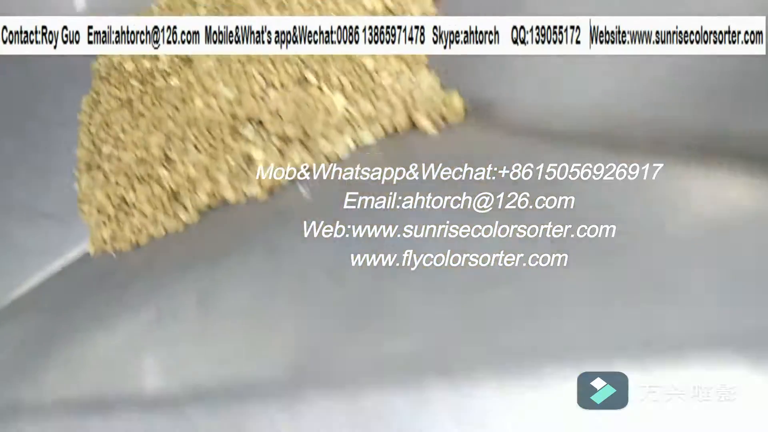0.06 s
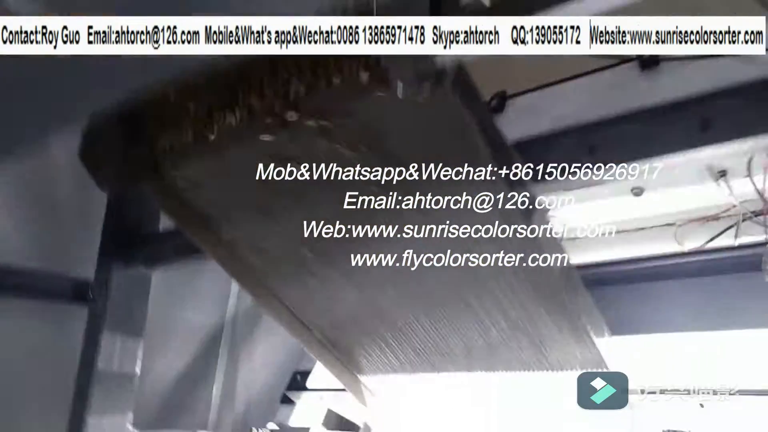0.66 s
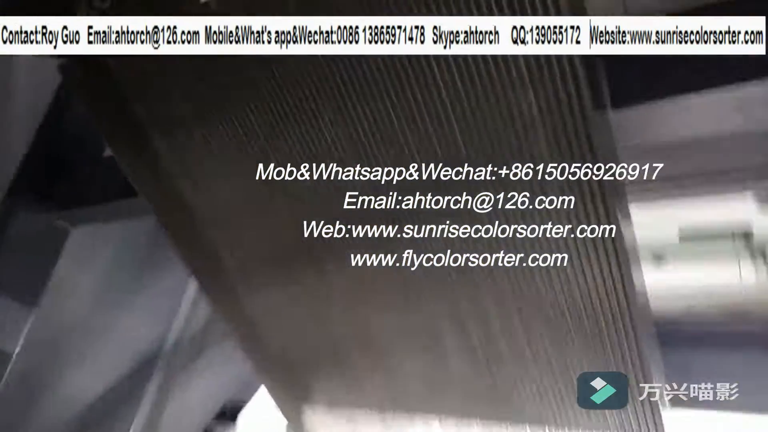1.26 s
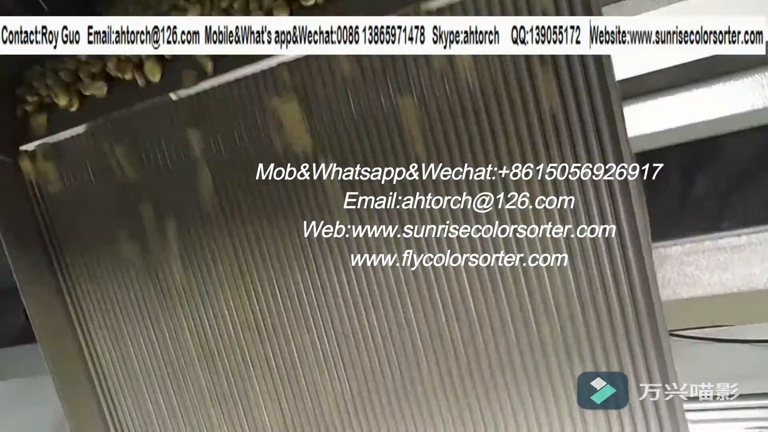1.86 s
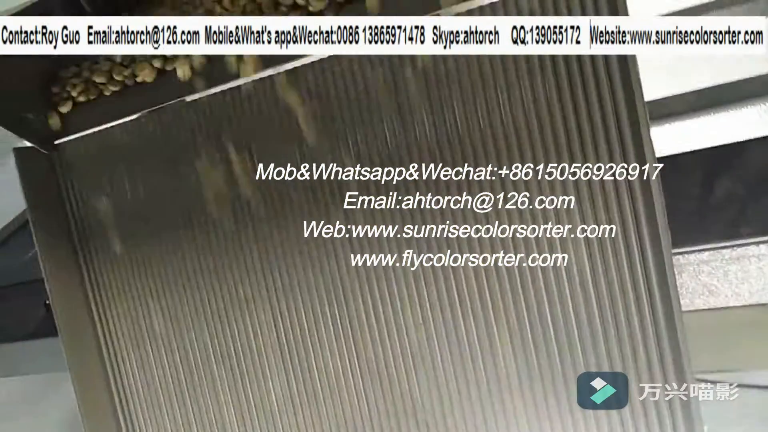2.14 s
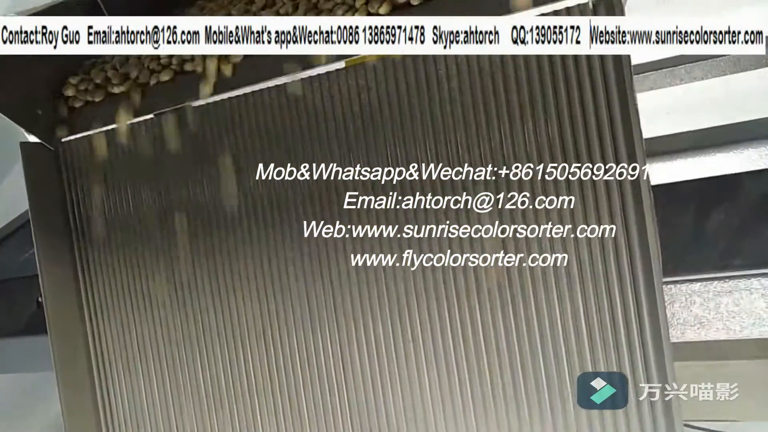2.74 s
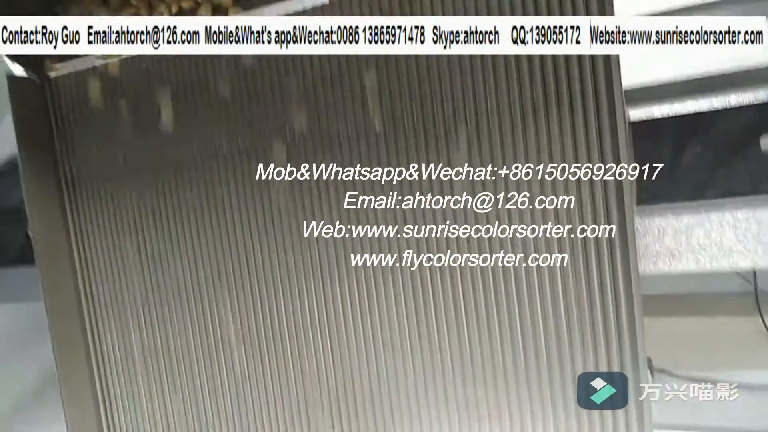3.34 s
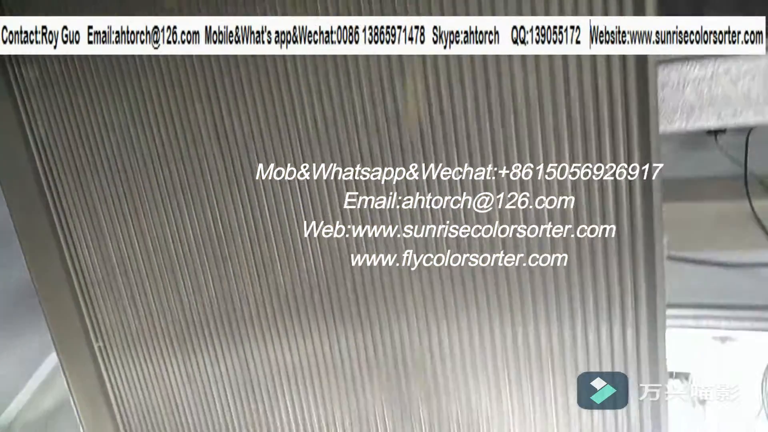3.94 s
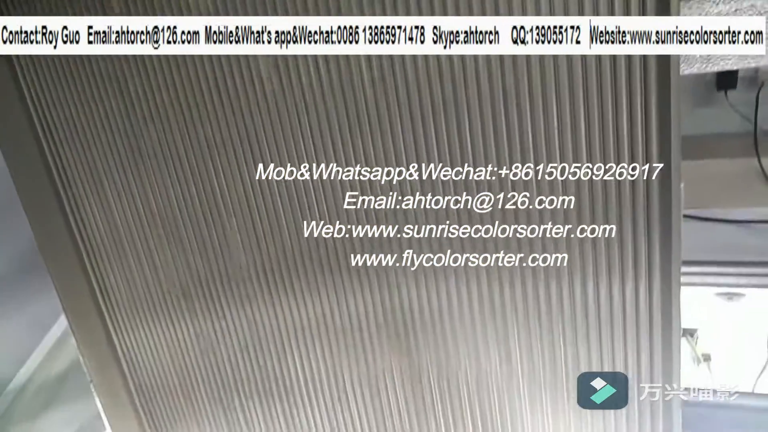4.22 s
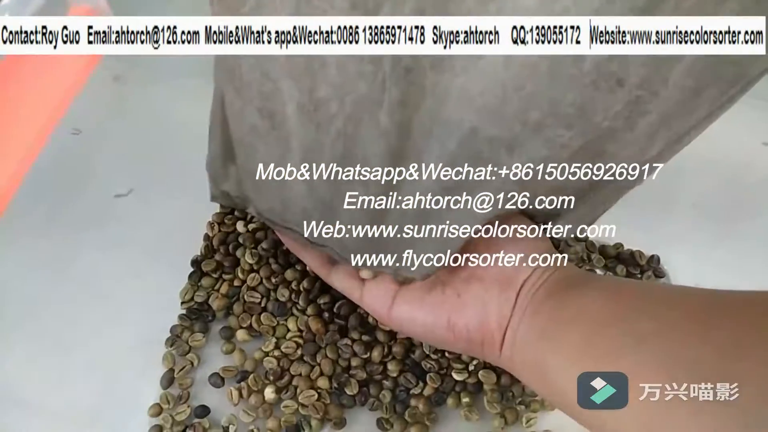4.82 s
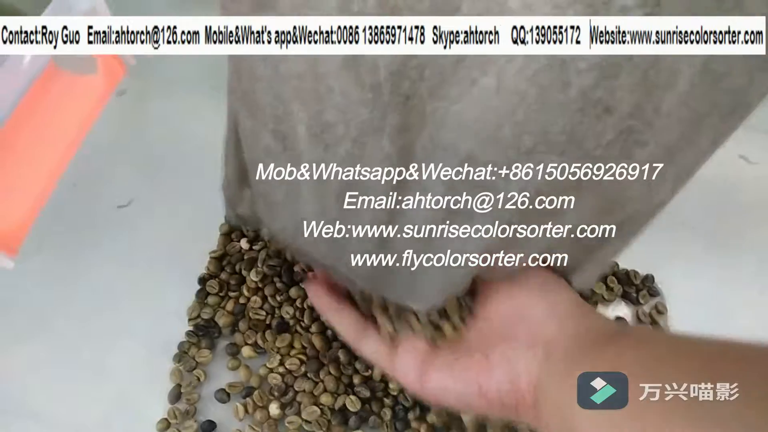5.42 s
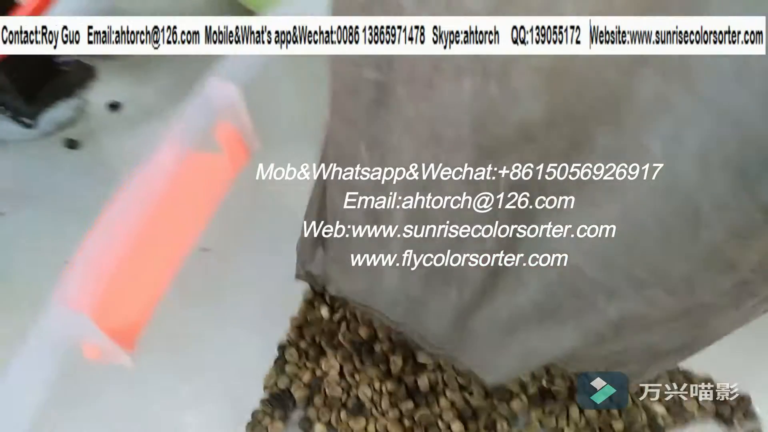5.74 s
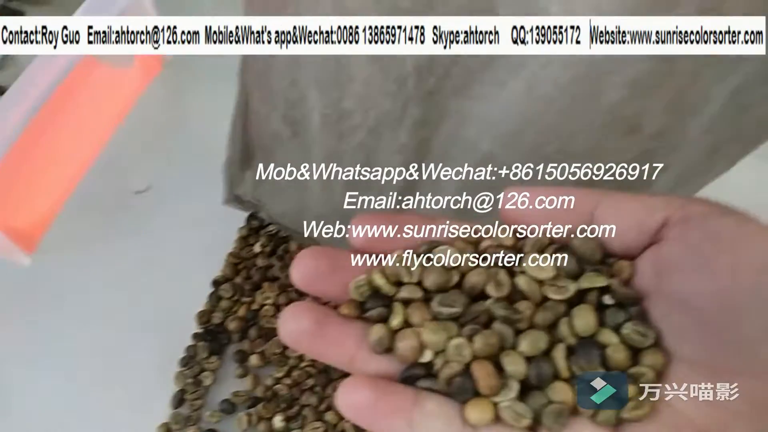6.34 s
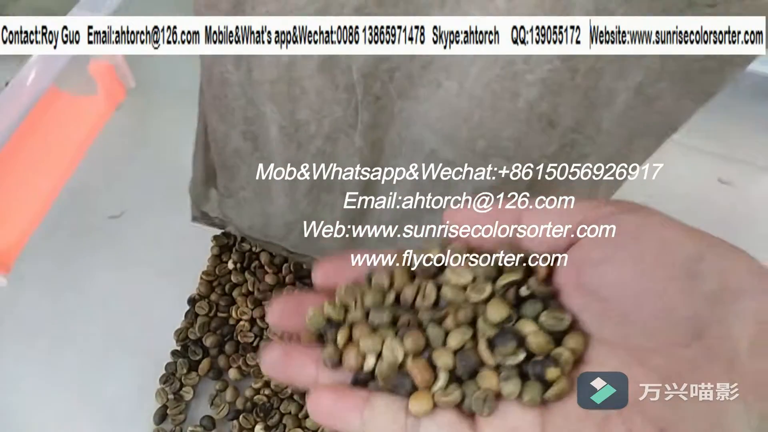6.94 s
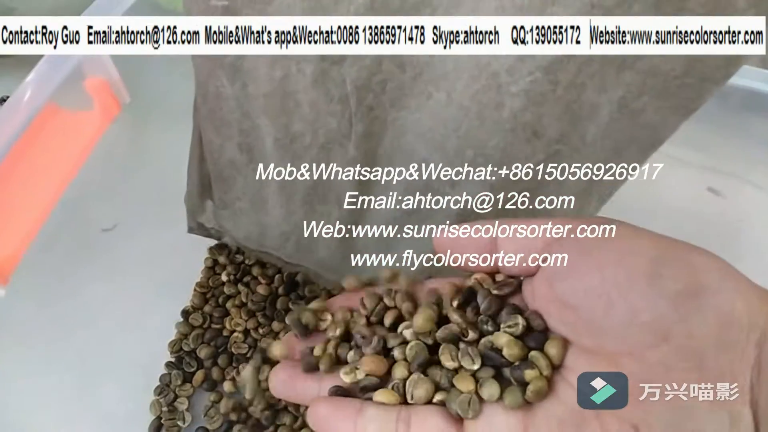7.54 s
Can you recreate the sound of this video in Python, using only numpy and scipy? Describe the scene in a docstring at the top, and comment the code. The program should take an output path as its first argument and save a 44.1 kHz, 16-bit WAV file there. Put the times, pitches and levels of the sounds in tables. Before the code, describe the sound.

Heard close up on a phone, a bean sorting machine hisses and clatters continuously, with irregular small air pops. A brief bump of fingers brings in the weak left side, which keeps dipping slightly. Single beans start knocking on the panels. After about four seconds the chute gives way abruptly to the outlet: a louder, ringing stream of beans on steel, with woody knocks and soft, low thumps from the hollow cabinet.

```python
"""A colour sorter, heard at its chute, then at its outlet. Beans hiss and clatter down the steel;
air ejectors rumble inside, pop and ring the cabinet. Near 1 s fingers knock on the phone and the
left side comes up; it keeps fading in and out, noise-suppressed. From 3 s beans knock on the panels.
At 4.3 s the scene changes to the outlet: the hiss is louder, the sheet steel sings under the beans
and bursts of air thump the cabinet."""
import sys
import numpy as np
from scipy import signal
from scipy.fft import rfft, irfft
from scipy.io import wavfile
from scipy.ndimage import uniform_filter1d

SR = 44100
rng = np.random.default_rng(int(sys.argv[2]) if len(sys.argv) > 2 else 0)


def to_wav(sig):
    """Store sig (one row per channel, or 1-D mono) as 16-bit WAV at the path in sys.argv[1].

    Samples outside -1..1 are clipped; the rate is SR.
    """
    pcm = np.clip(np.atleast_2d(sig), -1, 1) * 32767
    pcm = np.round(pcm).astype(np.int16)
    wavfile.write(sys.argv[1], SR, pcm.T)  # frames by channels


N = 333837
T = np.arange(N) / SR
F = np.maximum(np.arange(N // 2 + 1) * SR / N, 1)
OUTLET_START_S, TOP_HZ = 4.332, 15780

# bean stream at each place: (time [s], level [dB], brightness [dB])
CHUTE_FLOW = [(0, -17.7, -1.2), (0.26, -16.7, -0.4), (1.17, -18.3, -0.7), (1.32, -16.1, 0.9),
              (1.5, -16.6, 0), (1.59, -17.8, -0.3), (1.9, -15.8, 1.8), (2.21, -15.5, 1.2), (2.29, -17.8, 0),
              (2.36, -17, 0), (2.6, -16.9, 0.5), (3.13, -18.6, 0.2), (3.27, -16.7, -0.2), (3.33, -17.7, 0),
              (3.39, -16.1, 0), (3.52, -17.4, 0), (3.67, -18.3, 0.4), (3.77, -16.3, 0.4),
              (3.92, -17.6, 0.3), (4.17, -16.6, 0.5), (4.24, -18.6, 0.4), (4.32, -18, 0.5)]
OUTLET_FLOW = [(4.36, -11.8, 0.3), (4.45, -11.5, 0.6), (4.51, -13.3, -1.2), (4.58, -11.7, -0.5),
               (4.85, -11.3, 0), (5.0, -12.1, 0), (5.06, -10.9, 0.2), (5.38, -12.6, 0), (5.45, -11.6, -0.2),
               (5.63, -13.4, -0.5), (5.69, -11.4, -0.7), (6.0, -12.4, -0.2), (6.25, -12, 0),
               (6.34, -10.4, -0.2), (6.47, -13, 0), (6.55, -11.8, 0.3), (6.72, -13.7, -0.3),
               (6.82, -11.6, -0.3), (6.89, -13.7, 0), (7.08, -13.7, 0), (7.15, -15, -0.1),
               (7.19, -13.6, -0.1), (7.26, -12.8, -0.1), (7.56, -13.5, -0.8)]
# stream spectrum at each place: (frequency [Hz], gain [dB])
CHUTE_SPECTRUM = [(40, -46), (125, -38), (200, -7.5), (450, -3), (800, -0.5), (1350, -1), (1650, 1),
                  (2300, -0.5), (3200, 1.5), (6200, 0), (9500, 1.3), (11000, 1.4), (13500, 2.5),
                  (15700, -2)]
OUTLET_SPECTRUM = [(40, -43), (125, -26), (200, -13.5), (450, -9), (800, -9), (1250, -10), (1750, -4),
                   (3000, -4), (5300, -6), (6000, -6), (8400, -4.5), (9900, -6), (10600, -3), (13800, -2.5),
                   (15700, -4)]
# modes of the hollow cabinet and the sheet steel: (frequency [Hz], width [Hz], gain [dB])
CABINET_MODES = [(184, 13, -4.5), (213.6, 20.6, 7.5), (298.2, 19.7, 1.5), (371, 19, -5.5), (470, 74, -16.5),
                 (626, 23, 1.5), (684, 18.4, -0.5), (952, 14, -5)]
STEEL_MODES = [(935, 35, -5), (1005, 25, -6), (1651, 22, -2), (1928, 28, -3), (2001, 13, 3), (2312, 35, -5),
               (2856, 30, -5), (2996, 40, -3), (3324, 35, -8), (3903, 45, -8), (5367, 50, -8),
               (5641, 30, -2), (8482, 60, -9), (12617, 130, -9), (13795, 110, -9)]
# uneven work of the inner ejectors, one long lull: (time [s], relative level [dB])
INNER_WORK = [(0, -57), (1.2, -52), (1.55, -62), (1.67, -69), (2.18, -74), (2.3, -57), (2.5, -54),
              (2.92, -49), (3.15, -52.5), (3.82, -58), (4.1, -57), (4.3, -48.5), (7.5, -53.5)]
# ejector shots at the chute: (time [s], relative level [dB], pitch [Hz], thump drive offset [dB])
EJECTOR_POPS = [(0.195, -22, 850, -5), (0.289, -21, 1070, -1), (0.389, -20, 675, -18),
                (0.478, -31, 700, 12.5), (0.532, -24, 920, 1), (0.741, -17, 860, -8), (0.779, -18, 940, -3),
                (0.902, -15.5, 800, -8), (1.07, -15, 850, -8), (1.314, -28, 690, 4),
                (1.392, -25.5, 735, 1.5), (1.476, -22, 850, -3), (1.498, -18, 1050, -1.5),
                (2.163, -21.5, 740, -5), (2.318, -18, 660, -9), (2.52, -13.5, 910, -12),
                (2.558, -28, 725, 5), (2.634, -22, 845, -1), (2.685, -30, 960, -17),
                (2.813, -17.5, 726, -25), (2.886, -29, 640, 5), (2.948, -21.5, 760, -12),
                (3.261, -23.5, 674, -3), (3.352, -22, 590, -8), (3.385, -20.5, 920, -25),
                (3.535, -28, 740, 0), (3.574, -30, 780, 2), (3.626, -17, 714, -26), (3.638, -22, 800, -22),
                (3.652, -20.5, 715, -3.5), (3.762, -18, 855, -10), (3.776, -31, 620, 7),
                (3.80, -26, 636, -3), (3.82, -26, 810, 2), (3.856, -20.5, 850, -2), (3.918, -20, 736, -12),
                (3.954, -22, 1140, -20), (4.264, -23, 770, -20), (4.294, -26.5, 580, 3.5),
                (4.316, -34, 756, -12)]
# fingers on the phone: (time [s], relative level [dB])
FINGER_KNOCKS = [(.812, -23), (.947, -20), (.968, -17), (1.109, -20), (1.1285, -5.5), (1.1465, -5.5),
                 (1.1545, -3.5), (1.182, -20)]
# left fade, before scaling per band: (time [s], level [dB])
LEFT_FADE = [(1.11, -40), (1.15, -12), (1.212, -22), (1.242, -1.2), (2.24, -1.1), (2.33, -3), (3.05, -3.9),
             (3.2, -4.6), (3.28, -2.2), (3.33, -3.6), (3.4, -2), (3.64, -3.4), (3.77, -1.4), (3.96, -3.6),
             (4.12, -8.5), (4.21, -1.8), (4.32, -4.4), (4.35, -3.6), (5.2, -4.5), (6.35, -3.8), (7.0, -4.8),
             (7.26, -2.8), (7.55, -3.4)]
# brief dips in that fade: (time of bottom [s], depth [dB])
LEFT_DIPS = [(2.488, 3.5), (2.853, 4.5), (3.095, 6.5), (3.517, 9), (3.607, 7.5), (3.697, 7), (3.905, 4),
             (4.163, 6.5), (4.257, 3.5), (5.01, 2.5), (5.555, 2.5), (5.645, 3), (6.482, 2.5), (6.657, 4),
             (6.729, 4.5), (7.152, 8)]
# woody knocks of beans on panels: (time [s], relative level [dB], pitch [Hz], decay [s])
PANEL_KNOCKS = [(2.969, -16.5, 710, 0.0043), (3.042, -18, 696, 0.0039), (3.735, -21, 640, .005),
                (3.962, -18.5, 640, .006), (4.011, -19.5, 665, .005), (4.224, -15.5, 620, 0.0043),
                (4.497, -24, 884, .009), (4.551, -25, 940, .009), (4.596, -23, 626, 0.021),
                (4.654, -25, 987, .014), (4.787, -26, 940, .014), (4.831, -29, 1390, .014),
                (4.852, -17, 640, 0.012), (4.891, -20, 980, 0.017), (4.967, -29, 640, 0.0066),
                (5.045, -25, 955, 0.016), (5.078, -22.5, 1030, 0.018), (5.112, -24, 1350, .014),
                (5.125, -24, 630, 0.021), (5.258, -23, 676, 0.038), (5.31, -22.5, 931, 0.027),
                (5.526, -15, 657, 0.0098), (5.564, -19, 628, 0.0088), (5.677, -35, 1000, .014),
                (5.72, -18.5, 620, 0.011), (5.742, -19.5, 633, .02), (5.84, -19.5, 620, 0.01),
                (6.008, -22.5, 1120, 0.014), (6.056, -26, 640, 0.0094), (6.119, -17.5, 632, 0.017),
                (6.155, -19, 636, 0.013), (6.191, -16, 630, .007), (6.218, -18.5, 707, 0.014),
                (6.272, -20.5, 700, 0.016), (6.277, -21, 1320, .01), (6.347, -31, 690, 0.0053),
                (6.664, -25, 960, .006), (6.666, -18.5, 660, .012), (6.692, -19, 642, 0.015),
                (6.864, -19.5, 630, 0.011), (7.085, -30, 980, .014), (7.175, -19, 634, 0.011),
                (7.317, -17, 644, 0.0095), (7.325, -30, 990, .014), (7.404, -28, 646, .006)]
# cabinet thumps at the outlet: (time of peak [s], relative level [dB], pitch [Hz])
CABINET_THUMPS = [(4.452, -26, 244.7), (4.512, -19, 191), (4.536, -20, 207.5), (4.562, -24, 192),
                  (4.923, -17.5, 189), (4.955, -25, 213), (5.06, -23, 206), (5.454, -30, 197),
                  (5.545, -22, 203), (5.568, -25, 290), (5.63, -25, 211), (5.726, -21, 210),
                  (5.771, -25.5, 205), (5.857, -19.5, 209), (5.929, -20.5, 294), (5.998, -22.5, 210),
                  (6.099, -18, 204), (6.211, -18.5, 203.5), (6.234, -25, 233), (6.451, -24.5, 210),
                  (6.648, -17.5, 202), (6.684, -29, 202), (6.705, -21.5, 206), (6.735, -18.5, 194),
                  (7.009, -26, 208.5), (7.126, -22, 202), (7.186, -28, 206), (7.304, -25, 212),
                  (7.392, -23, 203.4), (7.514, -24, 216)]


def undb(db):
    """Decibels to gain."""
    return 10 ** (np.asarray(db) / 20)


def unit(x):
    """Scale to rms 1."""
    return x / np.sqrt(np.mean(x ** 2))


def curves(table):
    """Table columns, interpolated over time."""
    times_s, *columns = np.transpose(table)
    return [np.interp(T, times_s, column) for column in columns]


def shape(x, response):
    """Filter by a frequency response."""
    return irfft(rfft(x) * response, N)


def resonance(hz, width_hz):
    """Response of one damped mode, gain 1 at its centre."""
    return 1 / (1 + 1j * (F ** 2 - hz ** 2) / (F * width_hz))


def ringing(modes):
    """Summed response of a mode table."""
    return sum(undb(db) * resonance(hz, width_hz) for hz, width_hz, db in modes)


def colour(points):
    """Response through (frequency [Hz], gain [dB]) points."""
    hz, db = np.transpose(points)
    return undb(np.interp(np.log(F), np.log(hz), db))


def wander(rate_hz):
    """Smooth random drift, spread near 1."""
    hold = int(SR / rate_hz)
    steps = np.repeat(rng.standard_normal(1024), hold)[:N]
    return 1.17 * uniform_filter1d(uniform_filter1d(steps, hold), hold)


def impacts(rate_hz, spread_db):
    """Random stereo impulses, sizes exponentially distributed in dB."""
    hit = rng.random((2, N)) < rate_hz / SR
    size = undb(spread_db * np.minimum(rng.exponential(size=(2, N)), 4))
    return unit(hit * size * rng.choice([-1, 1], (2, N)))


def mic_ports(x, alike_hz=800):
    """Long waves reach both ports alike, short ones unrelated."""
    shared = .7 / np.sqrt(1 + (F / alike_hz) ** 6)
    left = shape(x[1], shared) + shape(x[0], np.sqrt(1 - shared ** 2))
    return np.array([left, x[1]])


def steel_pings(low_hz=1100, high_hz=14000, ring_s=.011, spread_db=2, count=4000):
    """Square hits ring the steel briefly, each spot at its own pitch."""
    span = SR // 18
    sound, t = np.zeros((2, N + span)), T[:span]
    for when, pitch, size, side, ring in rng.random((count, 5)):
        hz = low_hz + (high_hz - low_hz) * pitch
        tone = np.sin(2 * np.pi * hz * t) * np.exp(-t / (ring_s * (.5 + ring)))
        gain = undb(-spread_db * np.log(size + .035))
        pan = [np.cos(2 * np.pi * side), np.sin(2 * np.pi * side)]
        start = int(when * N)
        sound[:, start:start + span] += gain * np.outer(pan, tone)
    return unit(sound[:, :N])


def steel_walls(x, wet_db, decay_s=.013, hop_s=.16):
    """Dense close reflections that change as the beans scatter and the phone moves."""
    hop, t = int(hop_s * SR), T[:SR // 10]
    padded = np.pad(x, ((0, 0), (hop, 3 * hop)))
    wet, window = np.zeros_like(padded), np.sqrt(np.hanning(2 * hop))
    for start in range(0, N + hop, hop):
        echoes = rng.standard_normal((2, len(t))) * np.exp(-t / decay_s)
        echoes /= np.sqrt(np.sum(echoes ** 2, axis=1, keepdims=True))
        spray = signal.fftconvolve(padded[:, start:start + 2 * hop] * window, echoes, axes=1)
        wet[:, start:start + spray.shape[1]] += spray
    return x + undb(wet_db) * shape(wet[:, hop:hop + N], F / (F + 1200))


def clump_flutter_db(depth_db=1.2, rate_hz=132):
    """Beans come in clumps: quick flutter, no slow surges."""
    drift = wander(rate_hz)
    return depth_db * (drift - uniform_filter1d(drift, size=SR // 14))


def bean_stream(flow, spectrum, ticks, pings, tick_db, ping_db, wall_db, cabinet_db, steel_db):
    """Beans tick and ping over the hiss of their sliding; cabinet and steel colour it."""
    level_db, bright_db = curves(flow)
    hiss = rng.standard_normal((2, N))
    beans = mic_ports(hiss + undb(tick_db) * ticks + undb(ping_db) * pings)
    cabinet = 1 + undb(cabinet_db) * ringing(CABINET_MODES)
    steel = np.hypot(1, undb(steel_db) * np.abs(ringing(STEEL_MODES)))
    response = colour(spectrum) * cabinet * steel * (F < TOP_HZ)
    sound = unit(shape(steel_walls(beans, wall_db), response))
    treble = shape(sound, 1 / (1 + (7500 / F) ** 4))
    rattle = (sound - treble) * undb(-.5 * bright_db + clump_flutter_db())
    sizzle = treble * undb(.5 * bright_db + clump_flutter_db())
    return (rattle + sizzle) * undb(level_db)


def bean_clack(hz, ring_s, swell_s=.001, overtone_db=-12):
    """One bean on a panel: a short swelling note and a faster-dying overtone."""
    t = T[:SR // 10]
    note = np.sin(2 * np.pi * hz * t) * np.exp(-t / ring_s) * (1 - np.exp(-t / swell_s)) ** 2
    overtone = np.sin(2 * np.pi * 1.3 * hz * t) * np.exp(-2 * t / ring_s)
    return note / note.max() + undb(overtone_db) * overtone


def bean_clatter(start_s, end_s, low_hz, high_hz, ring_s, base_db, count, spread_db=3):
    """Small knocks at random pitches and places, with the bass cut away."""
    sound = np.zeros((2, N + SR))
    for when, pitch, size, side, ring in rng.random((count, 5)):
        note = bean_clack(low_hz * (high_hz / low_hz) ** pitch, ring_s * (.5 + ring))
        start = int((start_s + when * (end_s - start_s)) * SR)
        gain = undb(base_db - spread_db * np.log(size + .08))
        sound[:, start:start + len(note)] += gain * np.outer([np.cos(np.pi * side), 1], note)
    return shape(sound[:, :N], 1 / (1 + (300 / F) ** 4))


def inner_activity(waver_db=5.5, waver_hz=14, flurry_s=.039):
    """Gain of the inner shots: uneven work, plus a flurry that grows with each thump's level."""
    work_db, = curves(INNER_WORK)
    power = undb(work_db + waver_db * wander(waver_hz)) ** 2
    for time_s, thump_db, _ in CABINET_THUMPS:
        flurry_db = 1.63 * thump_db - 15
        power += undb(flurry_db) ** 2 * np.exp(-((T - time_s) / flurry_s) ** 2)
    return np.sqrt(power)


def inner_ejectors(rumble_db=-3.5, patter_db=9, pop_db=10):
    """Faint shots deep in the machine: rumble, cabinet patter, small hollow pops."""
    shots = mic_ports(impacts(rate_hz=130, spread_db=-4.5), alike_hz=980)
    cabinet = ringing(CABINET_MODES)
    rumble = unit(shape(shots, colour([(15, 11.5), (35, 10), (120, 12.5), (200, -14), (600, -60)])))
    patter = unit(shape(shots, cabinet * resonance(235, 800)))
    pops = unit(shape(shots, (.8 + cabinet) * resonance(450, 560) * resonance(1800, 950)))
    return (undb(rumble_db) * rumble + undb(patter_db) * patter + undb(pop_db) * pops) * inner_activity()


def air_puff(hz, swell_s=.0011, gasp_db=-2.5, gasp_s=.0044):
    """One air shot: a few cycles of hollow tone and a gasp, each of random length."""
    t = T[:SR // 20]
    tone_stretch, gasp_stretch = np.exp(.3 * rng.uniform(-1, 1, 2))
    age = t / (swell_s * tone_stretch)
    tone = np.sin(2 * np.pi * hz * t) * age * np.exp(1 - age)
    band = signal.butter(3, [hz / 2, hz * 1.8], "band", fs=SR, output="sos")
    gasp = unit(signal.sosfilt(band, rng.standard_normal(len(t))))
    return tone + undb(gasp_db) * gasp * np.exp(-t / (gasp_s * gasp_stretch))


def ejector_pops(pop_gain_db=-1, thump_gain_db=44, ring_db=-1):
    """Single air shots: a pop that rings the cabinet, and a soft thump."""
    puffs, kicks = np.zeros((2, N))
    for time_s, db, hz, thump_offset_db in EJECTOR_POPS:
        puff, start = air_puff(hz), int(time_s * SR)
        puffs[start:start + len(puff)] += undb(db) * puff
        kicks[start] += undb(db + thump_offset_db)
    cabinet = ringing(CABINET_MODES)
    pops = shape(puffs, 1 + undb(ring_db) * cabinet)
    thumps = shape(kicks, cabinet * resonance(289, 80))
    return undb(pop_gain_db) * pops + undb(thump_gain_db) * thumps


def finger_knocks(case_hz=205, case_s=.008, tick_hz=850, tick_s=.00049, gain_db=-1, right_db=-14):
    """Fingers tick and sway the phone's case near the left port."""
    force = np.zeros(N)
    for time_s, db in FINGER_KNOCKS:
        force[int(time_s * SR)] += undb(db + gain_db)
    t = T[:SR // 16]
    case = np.sin(2 * np.pi * case_hz * t) * np.exp(-t / case_s)
    tick = -2 * np.sin(2 * np.pi * tick_hz * t) * np.exp(-t / tick_s)
    knocks = signal.fftconvolve(force, case + tick)[:N]
    soft_fingertip = 1 / (1 + 1j * F / 1800)
    small_case = 1 / (1 + (140 / F) ** 3)
    return shape(knocks, soft_fingertip * small_case) * undb([[0], [right_db]])


def left_fade_db(sag_db_per_s=131, recover_db_per_s=322):
    """Fade control: a slow course with dips that sag and snap back."""
    fade_db, = curves(LEFT_FADE)
    for time_s, depth_db in LEFT_DIPS:
        above_bottom_db = np.maximum(sag_db_per_s * (time_s - T), recover_db_per_s * (T - time_s))
        fade_db -= np.maximum(depth_db - above_bottom_db, 0)
    return fade_db


def fade_left(x, waver_db=.3, waver_hz=22.02):
    """The left side fades in and out, treble most, bass least, under a fixed colouring."""
    fade_db = left_fade_db() + waver_db * wander(waver_hz)
    bass = shape(x, 1 / (1 + (F / 600) ** 4))
    treble = shape(x, 1 / (1 + (7500 / F) ** 4))
    faded = (bass * undb(.43 * fade_db + 3.2)
             + (x - bass - treble) * undb(.8 * fade_db + .5)
             + treble * undb(2.16 * fade_db + 4.5))
    tint = colour([(1000, .34), (3000, -1.5), (5200, 2.7), (7000, -1), (11500, 1.7), (15500, -1.1)])
    return shape(faded, tint)


def panel_knocks(gain_db=-2, left_db=-1):
    """Single beans knock on the panels, clear of the clatter."""
    sound = np.zeros(N)
    for time_s, db, hz, ring_s in PANEL_KNOCKS:
        note, start = bean_clack(hz, ring_s), int(time_s * SR)
        sound[start:start + len(note)] += undb(db + gain_db) * note
    return sound * undb([[left_db], [0]])


def cabinet_thumps(gain_db=-2, swell_s=.0096, fade_s=.011, sag=.092, air_db=-8, ring_db=-14, right_db=-1):
    """Air bursts heave a panel: a few cycles of a rough low note, sagging in pitch."""
    sound = np.zeros(N + SR)
    t = T[:SR // 8] - .04  # 0 at the peak
    air = undb(air_db) * unit(shape(rng.standard_normal(N), resonance(290, 360) ** 2))
    for time_s, db, hz in CABINET_THUMPS:
        stretch = np.exp(.3 * rng.uniform(-1, 1))
        envelope = np.exp(-.5 * (t / np.where(t < 0, swell_s, fade_s * stretch)) ** 2)
        pitch_hz = hz * (1 - sag * np.tanh(t / (2 * fade_s)))
        note = np.sin(2 * np.pi * np.cumsum(pitch_hz) / SR)
        start = int((time_s + t[0]) * SR)
        sound[start:start + len(t)] += undb(db + gain_db) * envelope * (note + air[start - len(t):start])
    cabinet = 1 + undb(ring_db) * ringing(CABINET_MODES) * F / (F + 200)
    return shape(sound[:N], cabinet) * undb([[0], [right_db]])


def scene(crossfade_s=.005):
    """The chute, then the outlet."""
    ticks, pings = impacts(rate_hz=3500, spread_db=2), steel_pings()
    chute = bean_stream(CHUTE_FLOW, CHUTE_SPECTRUM, ticks, pings,
                        tick_db=0, ping_db=-13.5, wall_db=1, cabinet_db=-2.5, steel_db=-6)
    chute += bean_clatter(0, OUTLET_START_S, low_hz=517, high_hz=1567,
                          ring_s=.0044, base_db=-34.5, count=280)
    outlet = bean_stream(OUTLET_FLOW, OUTLET_SPECTRUM, ticks, pings,
                         tick_db=-5.5, ping_db=-8.5, wall_db=2.5, cabinet_db=6.5, steel_db=3)
    outlet += bean_clatter(OUTLET_START_S, T[-1], low_hz=620, high_hz=1394,
                           ring_s=.014, base_db=-34, count=130)
    outlet_share = np.clip((T - OUTLET_START_S) / crossfade_s + .5, 0, 1)
    beans = chute * np.sqrt(1 - outlet_share) + outlet * np.sqrt(outlet_share)
    left, right = beans + ejector_pops() + inner_ejectors()
    return np.array([fade_left(left), right]) + cabinet_thumps() + panel_knocks() + finger_knocks()


def suppress_noise(x, strength, depth=2.4, reach_hz=7000, threshold=1.3, bass_extra=.9, bass_hz=500):
    """Bands not above their usual level are pushed down, low ones most."""
    hz, times_s, cells = signal.stft(x, SR, nperseg=1024, noverlap=768)
    power = uniform_filter1d(np.abs(cells) ** 2, size=4, axis=0)
    power = np.abs(uniform_filter1d(power, size=4, axis=1)) + 1e-14
    usual = np.exp(uniform_filter1d(np.log(power), size=60, axis=1))
    needed = threshold * (1 + bass_extra / (1 + (hz[:, None] / bass_hz) ** 2)) * usual
    exponent = depth * np.interp(times_s, T, strength) / (1 + hz[:, None] / reach_hz)
    gain = np.clip(power / needed, .1, 1) ** exponent
    return signal.istft(cells * gain, SR, nperseg=1024, noverlap=768)[1][:N]


def record(dry, open_db=2, range_db=6, ceiling=.88):
    """The phone suppresses left noise, harder as that side fades, rounds peaks and cuts the top."""
    strength = np.clip((open_db - left_fade_db()) / range_db, .15, 1)
    sound = np.array([suppress_noise(dry[0], strength), dry[1]])
    rounded = sound / (1 + (sound / ceiling) ** 6) ** (1 / 6)
    return signal.sosfilt(signal.ellip(10, .1, 70, TOP_HZ, fs=SR, output="sos"), rounded)


dry = scene()
out = record(dry)
to_wav(out)
```